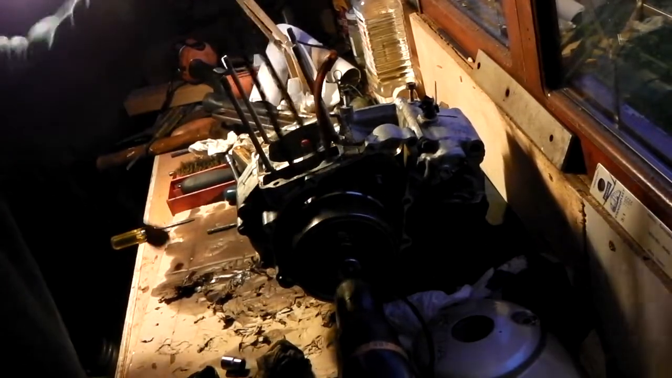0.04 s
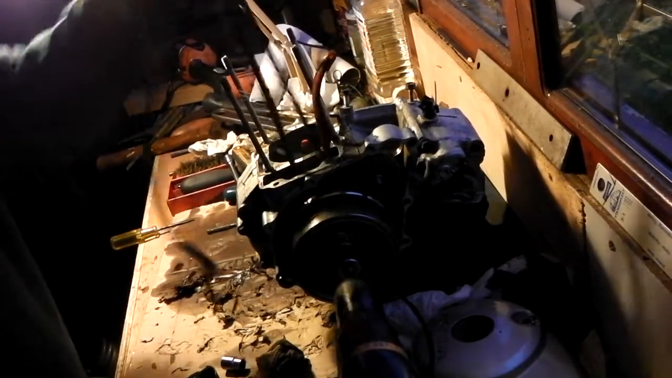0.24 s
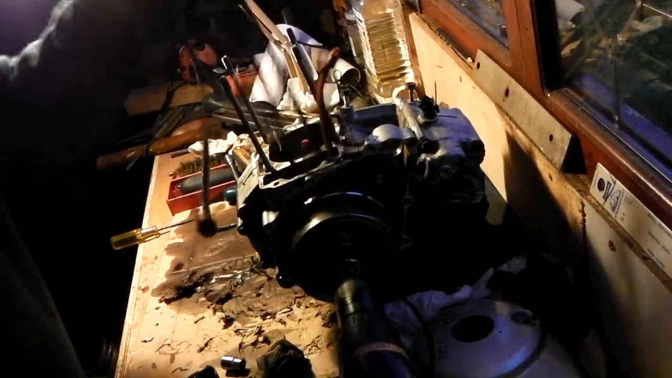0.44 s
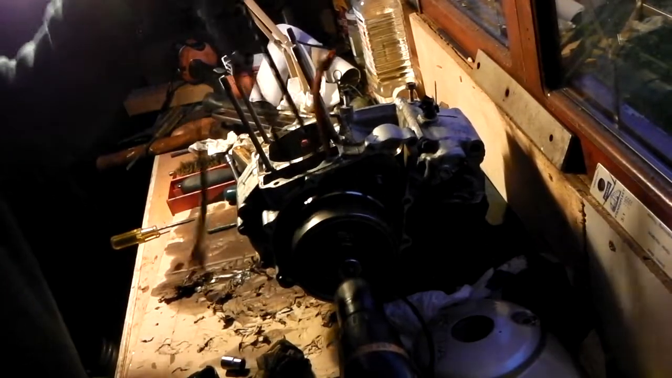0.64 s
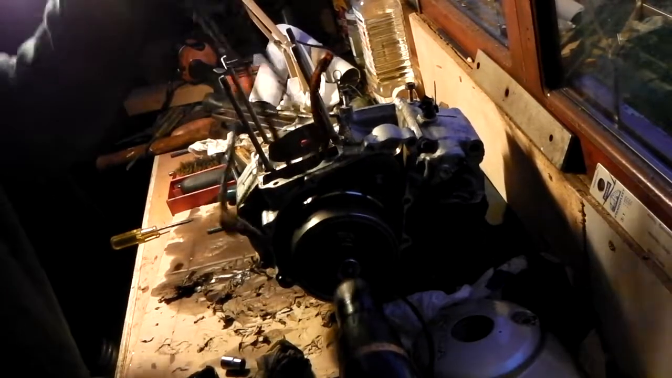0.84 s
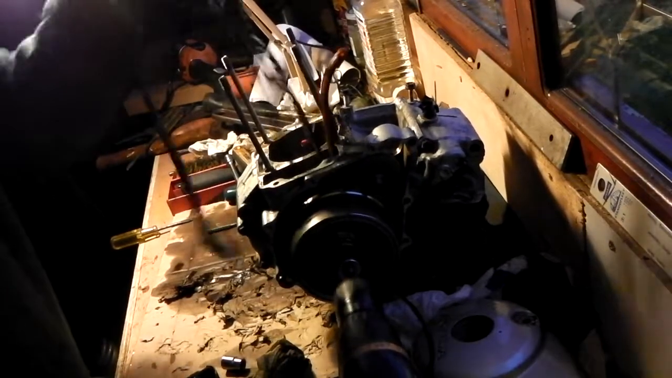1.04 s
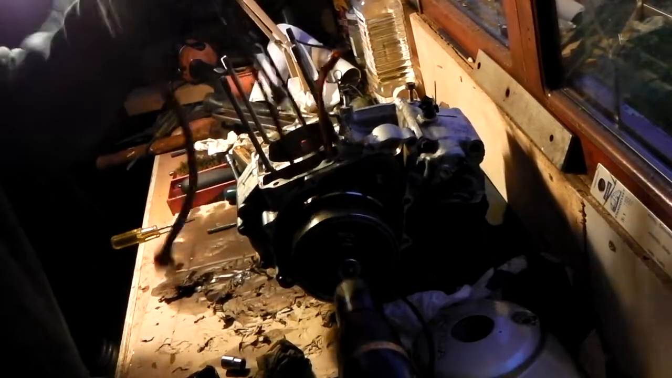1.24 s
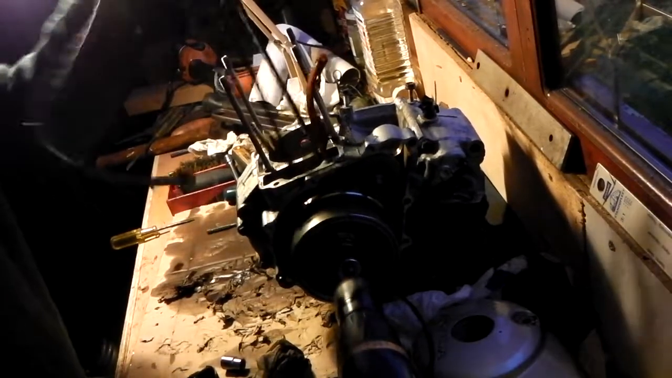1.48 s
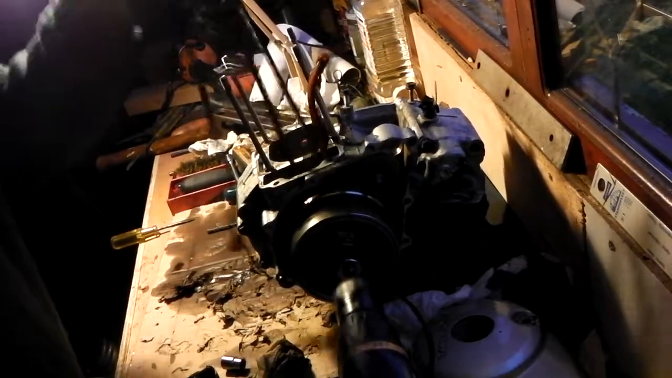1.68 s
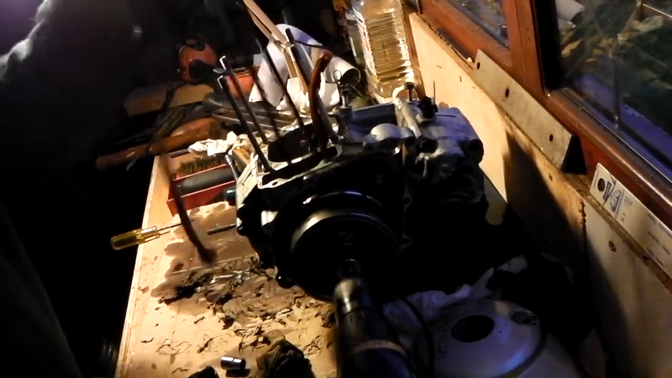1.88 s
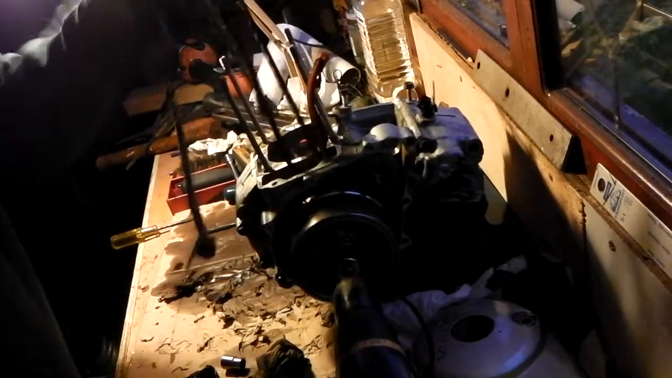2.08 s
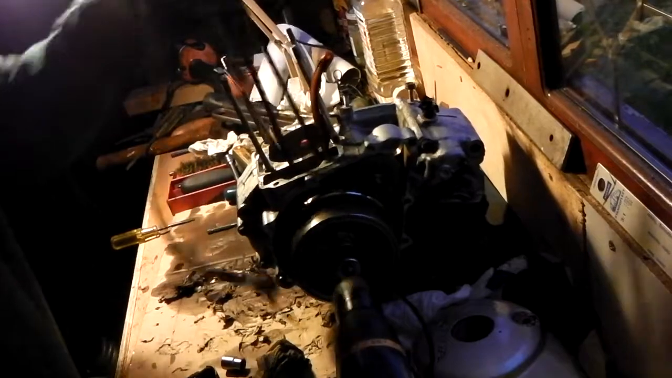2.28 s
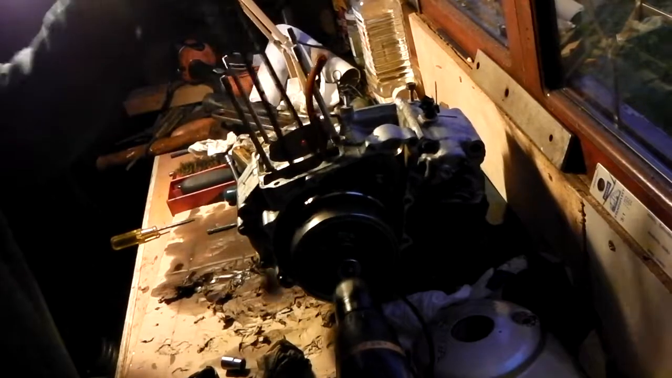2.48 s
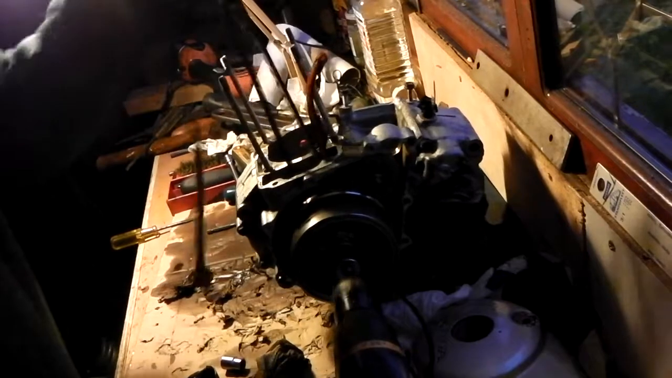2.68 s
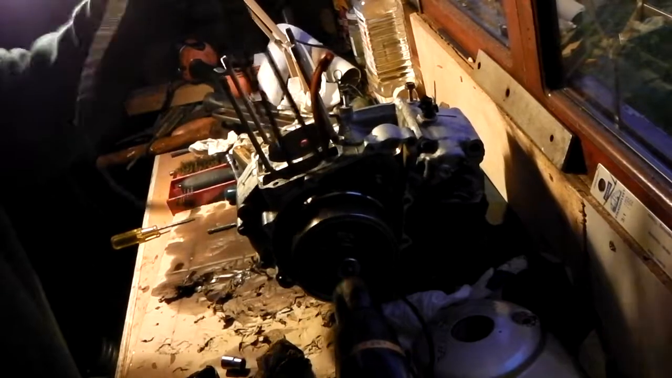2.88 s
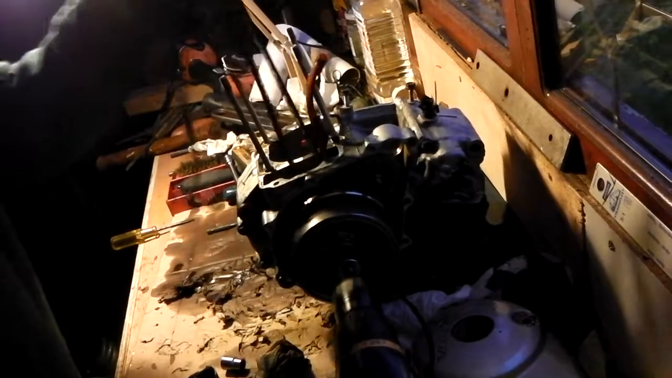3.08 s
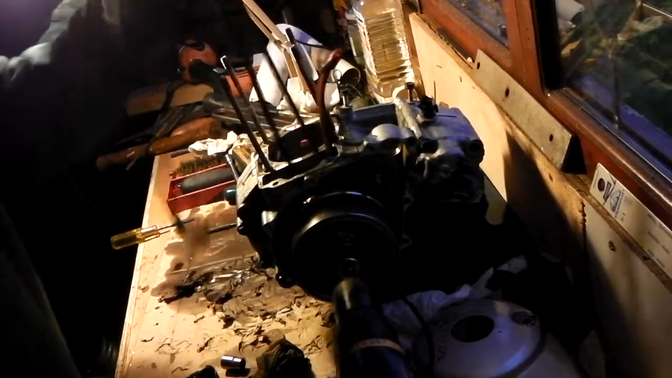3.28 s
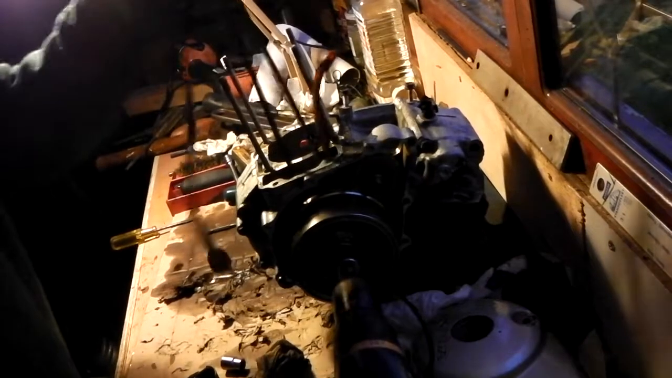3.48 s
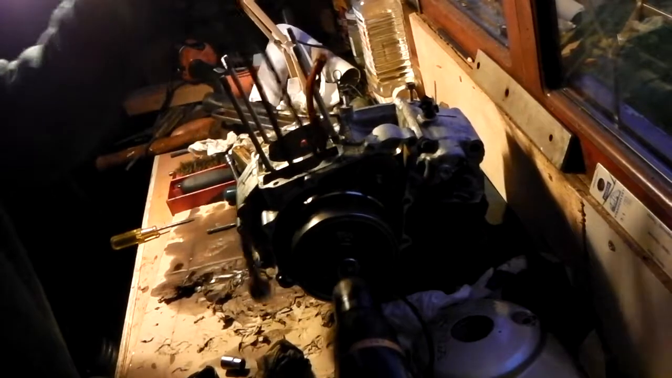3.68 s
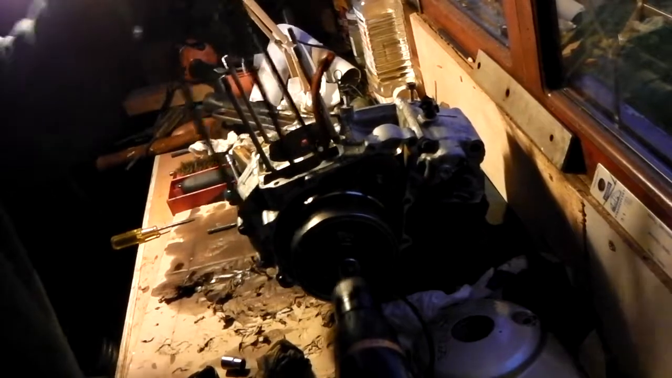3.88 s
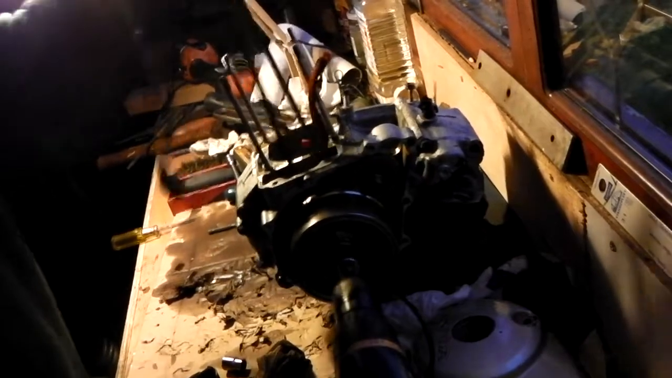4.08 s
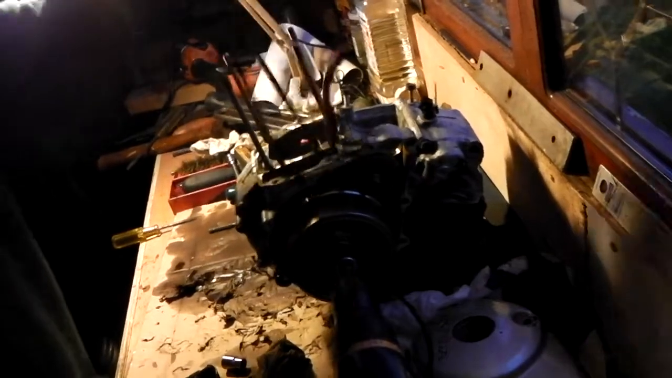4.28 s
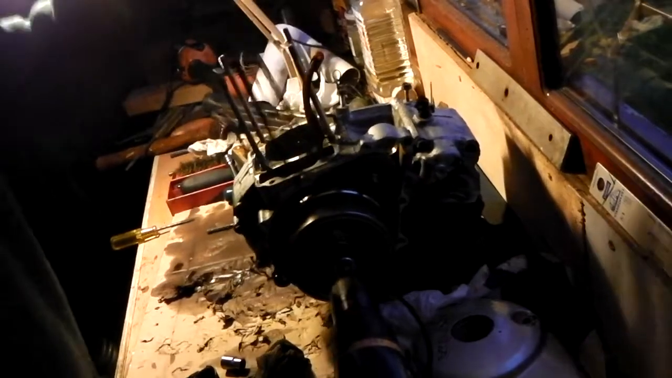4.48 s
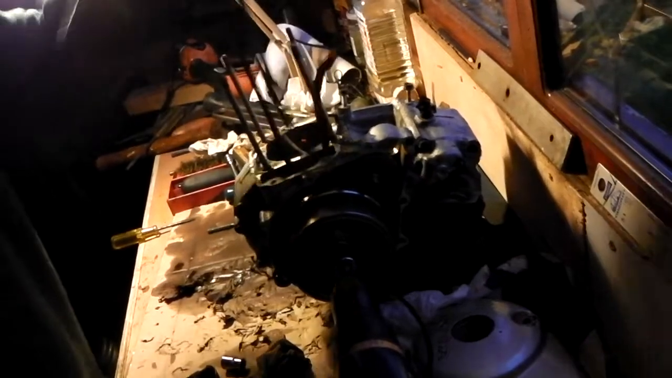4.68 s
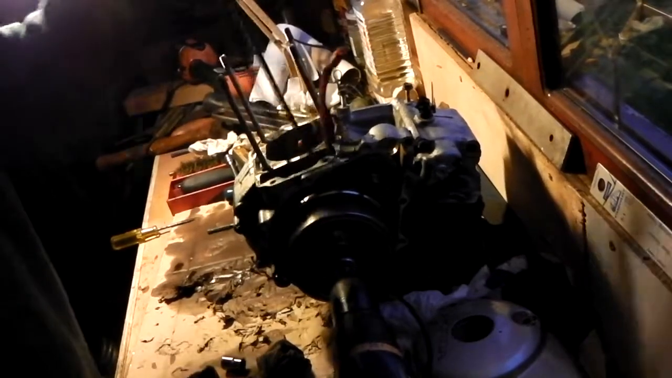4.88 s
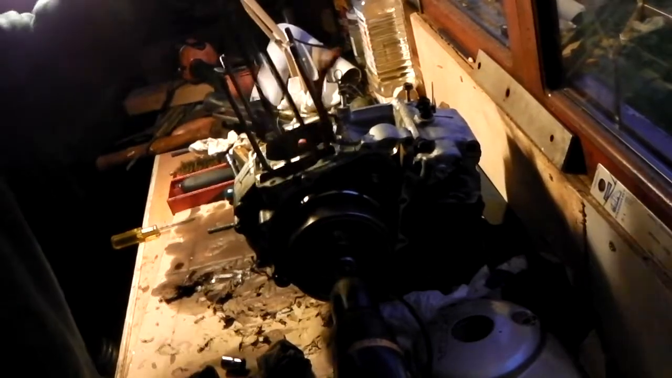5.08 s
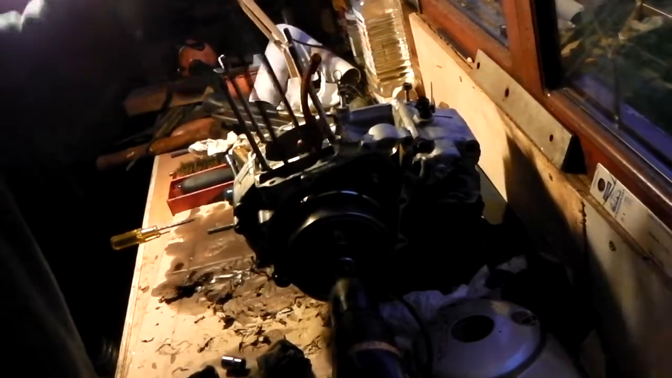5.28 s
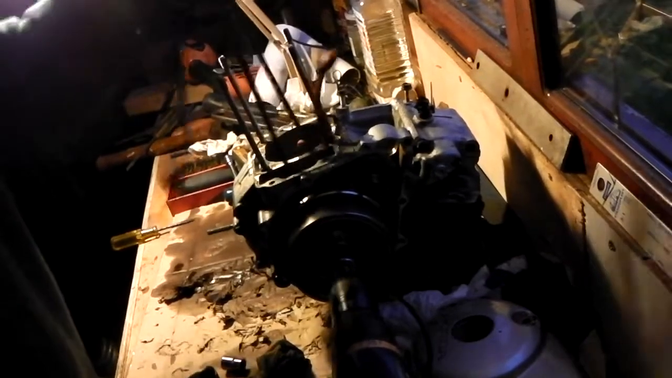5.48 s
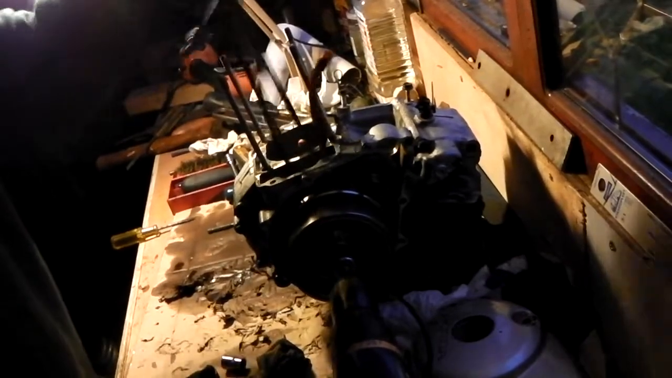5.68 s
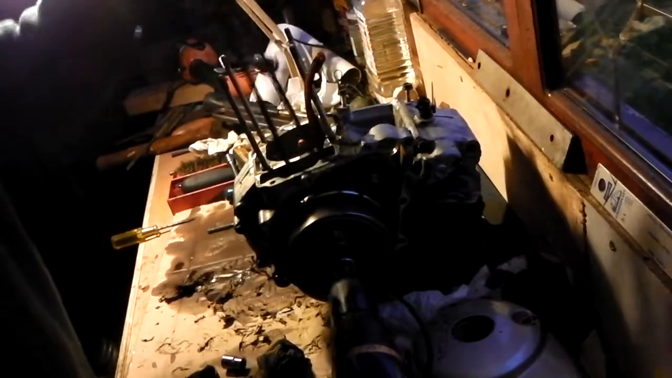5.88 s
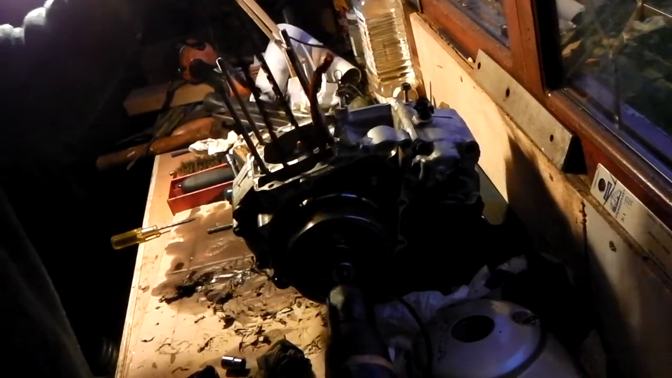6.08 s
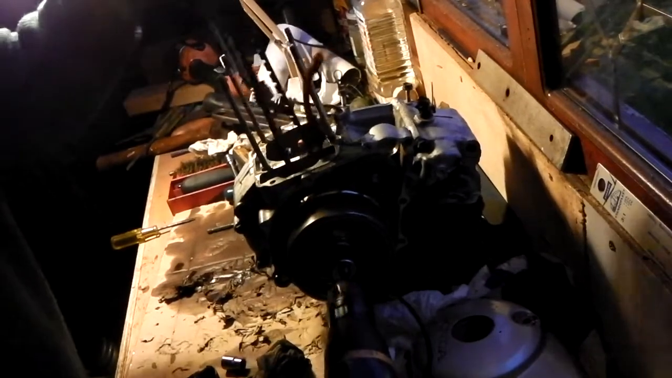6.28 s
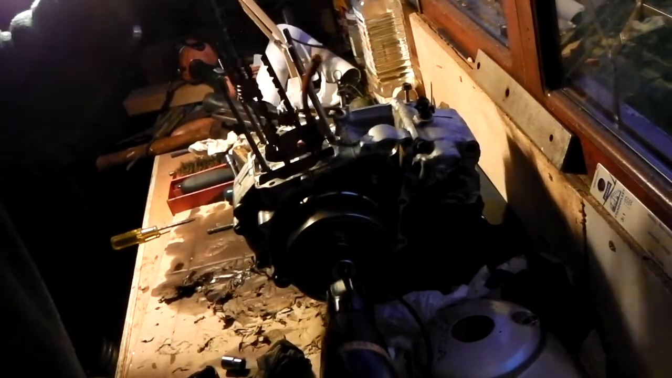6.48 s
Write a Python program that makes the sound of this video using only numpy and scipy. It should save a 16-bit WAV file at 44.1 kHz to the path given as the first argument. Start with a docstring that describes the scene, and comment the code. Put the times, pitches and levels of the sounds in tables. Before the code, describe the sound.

Heard very close in a small wooden shed, an electric drill is already spinning a stripped engine on a bench. From 0 to 3 s a loose chain rattles continuously and slaps the metal case about six times a second, hard steel clashes with hollow knocks; the whine and gear growl labour and recover once each turn. Between about 1.9 and 3 s distinct slaps are sparser within the rattle, with a dull clunk at 2.4. From 3.1 the drill surges, peaking near 3.7 to 3.9, with slaps crowding to nearly ten a second. It eases around 4.2, the hits strong at roughly eight a second, then gets lighter and more sizzling after 4.8. Bench thumps and gritty wood scrapes appear from 5.1 to 5.9, a heavier thump near 5.55. At 5.95 the drill is released; a clunk and last hard slap ring out at 5.99. Quiet hiss, faint ticks at 6.3 and 6.45, and a soft settling ring finish by 6.5.

```python
"""A drill whines and a loose cam chain rattles and slaps: an electric drill spins a stripped motorcycle engine.
The whine is motor orders through the housing, labouring once a lap of the crank; chain and slaps are bunched
noise. Slaps ring the crankcase modes; the rocking engine and the harder slaps thump the wooden bench; a small
shed adds a short tail. The drill is let go, the chain lands a last hard time and the steel rings out."""
import sys
import numpy as np
from scipy import signal
from scipy.fft import rfft, irfft, next_fast_len
from scipy.io import wavfile
from scipy.ndimage import map_coordinates

SR = 44100
rng = np.random.default_rng(int(sys.argv[2]) if len(sys.argv) > 2 else 0)


def dump_mix(stems):
    """Bounce the given channels to the path in sys.argv[1] as a 16-bit WAV at rate SR."""
    frames = np.atleast_2d(stems).T  # one column per channel
    limited = np.clip(frames, -1, 1)  # hard clip at full scale
    pcm = np.round(limited * 32767).astype(np.int16)
    wavfile.write(sys.argv[1], SR, pcm)


N = 288414


def amp(db):
    """Decibels to amplitude ratio."""
    return 10 ** (np.asarray(db) / 20)


def unit(x):
    """Scale to unit RMS."""
    return x / np.sqrt(np.mean(x ** 2) + 1e-20)


def along(points, hz):
    """Interpolate (hz, value) points on a log frequency axis."""
    point_hz, values = np.transpose(points)
    return np.interp(np.log(hz + 1), np.log(point_hz + 1), values)


def curves(rows):
    """One value per sample for each column after the time."""
    times_s, *columns = np.transpose(rows)
    return [np.interp(np.arange(N) / SR, times_s, column) for column in columns]


def wobble(rate_hz):
    """Smooth random curve of unit RMS, rate_hz knots a second."""
    knots = rng.standard_normal(int(N * rate_hz / SR) + 4)
    return unit(map_coordinates(knots, [np.arange(N) * rate_hz / SR]))


def filtered(x, response):
    """Multiply the spectrum of x by a complex response of frequency."""
    size = next_fast_len(N + 2 * SR)
    return irfft(rfft(x, size) * response(np.fft.rfftfreq(size, 1 / SR)), size)[..., :N]


def coloured(x, spectrum):
    """Shape a white signal, keeping its power."""
    return filtered(x, lambda f: unit(amp(along(spectrum, f))))


def resonance(f, hz, width_hz):
    """Response of one damped mode, unity at its centre."""
    return 1j * f * width_hz / (hz * hz - f * f + 1j * f * width_hz)


def add(track, start_s, sound):
    """Mix a sound in at a time."""
    start = max(0, round(start_s * SR))
    part = sound[..., :max(0, N - start)]
    track[..., start:start + part.shape[-1]] += part


def clatter(rate_hz, depth_db):
    """Two noises bunched into the same tiny contacts."""
    return unit(rng.standard_normal((2, N)) * amp(depth_db * wobble(rate_hz)))


# drill trigger: time_s, mean_motor_rev_per_s
MOTOR_SPEED = [(0, 429.3), (0.65, 434.2), (1.24, 439.1), (1.8, 462.7), (2.46, 478.1), (2.66, 475.8),
               (3.04, 506.5), (3.37, 653.9), (3.63, 710.3), (3.88, 718.4), (4.3, 584.9), (4.54, 568.7),
               (5.14, 599), (5.19, 584), (5.43, 624.7), (5.93, 625.7), (6, 582)]
GEAR_RATIO, FIRST_PEAK_LAPS = 74.93, .294  # motor revs per crank lap; laps to first load peak


def crank():
    """Laps turned so far; the load peaks at every whole number."""
    return np.cumsum(curves(MOTOR_SPEED)[0]) / SR / GEAR_RATIO - FIRST_PEAK_LAPS


# load round one lap: lap_share, load_about_mean
LAP_LOAD = [(0, .6), (.573, -.4), (.714, -.4), (1, .6)]


def load():
    """The drag of the engine, rising and falling with the crank angle."""
    return np.interp(crank() % 1, *np.transpose(LAP_LOAD))


# share of speed lost per unit load at SAG_REV_PER_S; faster, the flywheel carries it through
SAG, SAG_REV_PER_S, FLYWHEEL_POWER = .13, 430, 2.9


def motor_speed():
    """The motor labours and picks up again once a lap."""
    mean, = curves(MOTOR_SPEED)
    sag = SAG * (SAG_REV_PER_S / mean) ** FLYWHEEL_POWER
    return mean * (1 - sag * load())


def load_peaks():
    """The moment of greatest load in each lap, while the drill drives."""
    laps, t = crank(), np.arange(N) / SR
    lap_count = np.interp(MOTOR_SPEED[-1][0], t, laps)
    return np.interp(np.arange(lap_count), laps, t)


def each_lap(levels, delay_s, scatter_db):
    """One (start_s, level_db) event a lap, its strength read from a level curve."""
    times = load_peaks() + delay_s
    levels_db = np.interp(times, *np.transpose(levels)) + scatter_db * rng.standard_normal(len(times))
    return list(zip(times, levels_db))


def tones(turn, orders):
    """Shaft orders that flicker in strength and drift in phase between the shared and unshared parts."""
    drift = np.array([np.zeros(N), 2 * wobble(12)])
    return sum(amp(db + 2.6 * wobble(60)) * np.sin(round(order) * turn + drift) for order, db in orders)


# whine, relative: time_s, fan_db, commutator_db
WHINE = [(0, -39, -36), (1.6, -36, -34), (2.95, -36, -33), (3.2, -29, -27.5), (3.5, -29, -37),
         (3.9, -34, -36), (4.7, -36, -38.5), (5.1, -34.5, -36.5), (5.9, -40, -40), (6.1, -90, -90)]
# shaft judder under load: time_s, judder_rms_rad
JUDDER = [(0, .04), (1.2, .055), (2.9, .06), (3.3, .055), (4.2, .055), (6, .04)]
# fan orders: motor_speed_multiple, relative_db
FAN = [(2, -9), (4, 0), (8, -4.5)]
# commutator orders: motor_speed_multiple, relative_db
COMMUTATOR = [(6, 0), (12, -4)]
# drill housing response: freq_hz, relative_db
HOUSING = [(800, -14), (1600, -8), (1850, -1), (2100, 0), (2400, 0), (2560, -4), (2740, 4), (2950, 0),
           (3550, 0), (4300, -6), (5400, -2), (7000, -8), (10000, -20)]
# reduction gear growl: time_s, level_db
GEAR = [(0, -46.5), (1.2, -48.5), (2.9, -42), (3.3, -57), (5.9, -60), (6.05, -100)]
SURGE_DB, WAVER_RMS_DB = 6.5, 1.8  # whine drop per unit of load; slow random variation


def drill():
    """Motor tones through the housing, swelling as the motor picks up in each lap, and the growl of the gear."""
    speed = motor_speed()
    fan_db, commutator_db = curves(WHINE)
    surge_db = WAVER_RMS_DB * wobble(16) - SURGE_DB * load()
    turn = 2 * np.pi * np.cumsum(speed * (1 + .003 * wobble(260))) / SR
    turn = turn + curves(JUDDER)[0] * wobble(220)
    motor = tones(turn, FAN) * amp(fan_db) + tones(turn, COMMUTATOR) * amp(commutator_db)
    whine = filtered(motor * amp(surge_db + 4), lambda f: amp(along(HOUSING, f)))
    mesh_order = 1.07
    growl = unit(np.sin(mesh_order * turn + .3 * wobble(90)) * amp(2.5 * wobble(50)))
    return whine + growl * amp(curves(GEAR)[0]) * np.array([[1], [0]])  # growl in the shared part only


# running chain and gears, relative: time_s, rattle_db, hiss_db
RUNNING = [(0.0, -21.5, -31.5), (1.05, -18, -32.5), (1.45, -19.5, -30.5), (3.38, -17.5, -29),
           (3.66, -23.5, -27.5), (4.23, -23.5, -34), (4.71, -27, -35.5), (5.18, -25.5, -34.5),
           (5.9, -26.5, -37), (6.11, -36, -62)]
# rattle spectrum: freq_hz, relative_db_per_hz
RATTLE = [(150, -55), (250, -25), (528, -8.5), (586, -11.5), (1610, -6.5), (1880, -6), (2400, -5.5),
          (2860, -1), (3340, -3.5), (3840, 2), (4190, -6), (5730, -1.5), (7700, -18.5), (8700, -16.5),
          (16000, -25.5)]
# chain sizzle spectrum: freq_hz, relative_db_per_hz
SIZZLE = [(4000, -23), (7000, 4), (9000, 1.5), (11000, -4), (16000, -6)]


def rattle():
    """Links and teeth chatter for as long as the crank is driven."""
    rattle_db, hiss_db = curves(RUNNING)
    driven = np.interp(np.arange(N) / SR, [5.96, 6.14], [1, 0])
    body = coloured(clatter(rate_hz=700, depth_db=-1), RATTLE) * amp(rattle_db + 0.87 * wobble(90))
    hiss = coloured(clatter(rate_hz=450, depth_db=0.5), SIZZLE) * amp(hiss_db)
    return (body + hiss) * driven


# chain against the case, relative: start_s, clash_db, sizzle_db
SLAPS = [(0.0014, -8.5, -24), (0.0897, -10.5, -20.5), (0.286, -14.5, -36), (0.3694, -18, -27),
         (0.4422, -10, -24), (0.6147, -12.5, -29), (0.79, -13.5, -28), (0.967, -17, -36),
         (1.1344, -10.5, -18.5), (1.3083, -12, -26), (1.479, -12, -30), (1.6544, -10, -38),
         (1.8158, -13, -41), (2.513, -16, -21.5), (3.13, -11, -17.5), (3.2898, -10, -25),
         (3.413, -9.5, -17), (3.5247, -11.5, -15), (3.5883, -11, -27), (3.628, -9.5, -17.5),
         (3.7352, -10, -16.5), (3.8365, -9, -15.5), (3.941, -10.5, -24), (4.123, -7, -22),
         (4.2502, -7, -19.5), (4.3798, -6, -15.5), (4.515, -8.5, -16.5), (4.6456, -8, -20),
         (4.778, -16, -16.5), (4.894, -13, -24.5), (5.0286, -15.5, -24), (5.278, -12, -13),
         (5.4004, -14, -13), (5.5164, -10.5, -22.5), (5.6401, -16, -17), (5.7592, -15.5, -14.5),
         (5.8726, -14.5, -29), (5.914, -13.5, -18), (5.9863, -8, -19), (6.2906, -52, -56),
         (6.4512, -51, -62)]


def slap_part(levels_db, spectrum, hold_s, t60_s, gain_db):
    """A run of links lands within a few milliseconds, then the chatter dies."""
    t = np.arange(SR // 3) / SR
    shape = (1 - np.exp(-t / 0.0002)) * amp(-60 * np.maximum(t - hold_s, 0) / t60_s)
    power = np.zeros(N)
    for (start_s, *_), level_db in zip(SLAPS, levels_db):
        add(power, start_s, (amp(level_db + gain_db) * shape) ** 2)
    return coloured(np.sqrt(power) * clatter(rate_hz=600, depth_db=2.0), spectrum)


# how squarely the chain meets the side cover: time_s, knock_re_clash_db
HOLLOW = [(0, -10), (0.8, -3.5), (1.8, -8.5), (2.8, -11), (3.35, -6.5), (3.9, -9.5), (4.3, -15), (4.9, -11),
          (6, -14)]
# steel clash spectrum: freq_hz, relative_db_per_hz
CLASH = [(1000, -20), (2000, -6.5), (2900, -3.5), (3800, 5), (4500, -3.5), (5700, 2), (7000, -6.5),
         (9000, -36), (14000, -27)]
# hollow knock spectrum: freq_hz, relative_db_per_hz
KNOCK = [(150, -39.5), (330, -30), (600, 0.5), (1100, 3.5), (1700, 5.5), (2500, -9), (5000, -36.5)]


def slaps():
    """Each slap is a steel clash with a sizzle on top and a hollow knock that rings the side cover."""
    times, clash_db, sizzle_db = np.transpose(SLAPS)
    knock_db = clash_db + np.interp(times, *np.transpose(HOLLOW))
    clash = slap_part(clash_db, CLASH, hold_s=0.0041, t60_s=.16, gain_db=-3.0)
    knock = slap_part(knock_db, KNOCK, hold_s=0.0048, t60_s=0.1, gain_db=-4.5)
    sizzle = slap_part(sizzle_db, SIZZLE, hold_s=0.012, t60_s=0.16, gain_db=-0.5)

    def cover_modes(f):
        low = amp(8) * resonance(f, hz=822, width_hz=15.5)
        high = amp(7.5) * resonance(f, hz=1785, width_hz=94)
        return low + high

    return clash + knock + filtered(knock, cover_modes) + sizzle


# how loosely the chain flies: time_s, lull_depth_db
SLACK = [(0, 2.7), (1.2, 1.4), (3.1, 1.3), (3.3, 7.7), (3.7, 2.7), (4.05, 0.98), (4.4, 7.2), (4.9, 4.9),
         (5.1, 2.3), (6, 3.1)]
LULL_FALL_S, LULL_HOLD_S, LULL_RISE_S = 0.027, 0.0086, 0.0076


def lulls():
    """The load lets go as the chain flies free, just before it lands: a gain dip before each slap."""
    dip, t = np.zeros(N), np.arange(N) / SR
    corners_s = [-LULL_FALL_S - LULL_HOLD_S, -LULL_HOLD_S, 0, LULL_RISE_S]
    for start_s, *_ in SLAPS:
        dip = np.maximum(dip, np.interp(t - start_s, corners_s, [0, 1, 1, 0]))
    return amp(-dip * curves(SLACK)[0])


# crankcase modes: freq_hz, width_hz, relative_db
CASE = [(816, 21, 1.5), (1217.5, 21, 2.5), (1340, 17, -5), (1835, 35, -1.5), (2205, 33, -2.5),
        (2620, 17, -26), (2700, 10, -19), (2780, 6.9, -1), (3200, 12, -19), (3500, 20, 5.5),
        (3567, 0.56, 3), (3780, 64, -27), (4140, 33, -7), (5350, 12, -13), (5360, 17, -6), (5845, 11, 7),
        (5840, 2.5, -6.5), (6140, 46, -1.5)]


def crankcase(x):
    """Chain and gear contacts ring the same modes of the case."""
    def modes(f):
        return 1 + sum(amp(db) * resonance(f, hz, width_hz) for hz, width_hz, db in CASE)

    return amp(-4.5) * filtered(x, modes)


# gear ping strength: time_s, relative_db
TAPS = [(0, -31), (0.7, -29.5), (1.25, -31.5), (1.9, -44), (3.2, -42), (4, -51)]
# gear wheel modes: freq_hz, relative_db, t60_s
TOOTH = [(1197, 2.5, 0.17), (2390, -1.5, 0.33)]
TAP_LEAD_S, TAP_SCATTER_DB = .027, 4.5  # before the load peak; lap to lap


def taps():
    """Soft pings of the gear wheel as the gears take up their play just before each load peak."""
    out, t = np.zeros((2, N)), np.arange(SR // 3) / SR
    for start_s, tap_db in each_lap(TAPS, -TAP_LEAD_S, TAP_SCATTER_DB):
        ring = np.zeros(len(t))
        for hz, mode_db, t60_s in TOOTH:
            decay = amp(tap_db + mode_db + rng.normal(0, 1.6) - 60 * t / t60_s)
            ring += decay * np.sin(2 * np.pi * hz * rng.normal(1, 0.0015) * t)
        add(out[0], start_s, ring * (1 - np.exp(-t / 0.0042)))
    return out


# case singing under strain, at its peak in each lap: time_s, level_db
STRAIN = [(0, -38.5), (1.2, -30.5), (2.8, -37), (3.3, -38.5), (5.9, -41), (6.05, -90)]
STRAIN_PEAK_LAPS, STRAIN_HALF_SWING_DB = 0.19, 9


def strain():
    """A narrow rubbing ring that swells just after each load peak."""
    noise = rng.standard_normal((2, N))
    ring = unit(filtered(noise, lambda f: resonance(f, hz=1840, width_hz=144) ** 2))
    swell = np.cos(2 * np.pi * (crank() - STRAIN_PEAK_LAPS)) - 1
    return ring * amp(curves(STRAIN)[0] + STRAIN_HALF_SWING_DB * swell)


# engine rocking once a lap: time_s, relative_thump_db
ROCKING = [(0, -34), (0.75, -29.5), (1.3, -44), (2.4, -41.5), (3.2, -43), (3.8, -36.5), (4.4, -48),
           (4.55, -34.5), (4.82, -47), (5.18, -30.5), (5.43, -39), (5.55, -20.5), (5.8, -39), (5.91, -44)]
# off-beat thumps as the harder slaps push the bench, and the engine coming to rest: start_s, relative_thump_db
JOLTS = [(0.965, -32), (1.142, -27), (3.329, -33), (3.425, -31.5), (4.897, -31), (5.945, -36),
         (6.003, -35), (6.105, -39.5), (6.177, -46), (6.349, -50)]
# bench modes: freq_hz, width_hz, relative_db
BENCH = [(82.3, 29, -4), (125, 44, 2.5), (184.5, 60, -0.5)]
# rumble spectrum: freq_hz, relative_db_per_hz
RUMBLE = [(20, -23), (45, -0.5), (75, 3.5), (125, 6), (190, -3), (300, -25), (600, -27.5)]
# bench rumble: time_s, level_db
SHAKE = [(0, -51.5), (3, -49), (3.5, -49.5), (6, -50), (6.25, -61), (6.54, -77)]
THUMP_LAG_S, THUMP_SCATTER_DB = 0.00636, 1  # after the load peak; lap to lap


def bench():
    """The engine's weight thumps the boards and drops back once, more softly, over a steady rumble."""
    pushes = np.zeros((2, N))
    for start_s, db in each_lap(ROCKING, THUMP_LAG_S, THUMP_SCATTER_DB) + JOLTS:
        spread = np.array([[1], [rng.normal(0, 0.97)]])
        add(pushes, start_s, amp(db + 46.5) * np.hanning(96) / 48 * spread)
        add(pushes, start_s + 0.0231, amp(min(db, -33) + 44.5) * np.hanning(256) / 128 * spread)

    def modes(f):  # alternating signs
        return sum((-1) ** k * amp(db) * resonance(f, hz, width_hz)
                   for k, (hz, width_hz, db) in enumerate(BENCH))

    rumble = coloured(clatter(rate_hz=36, depth_db=3.5), RUMBLE) * amp(curves(SHAKE)[0])
    return filtered(pushes, modes) + rumble


# room hiss spectrum: freq_hz, relative_db_per_hz
QUIET = [(18, -58), (30, -28), (109, -11), (252, -12.5), (913, -8.5), (1590, -13), (1810, -8), (2010, -10),
         (3580, -15.5), (16000, -33)]
# soft case ring as the crank settles: time_s, level_db
SETTLE = [(6.34, -110), (6.355, -55), (6.42, -55), (6.5, -62), (6.54, -72)]


def stillness():
    """Room hiss, a low hum and the soft ring as the crank settles."""
    air = coloured(rng.standard_normal((2, N)), QUIET) * amp(-59.0)
    hum = amp(-62.0) * np.sin(2 * np.pi * 112 * np.arange(N) / SR + .2 * wobble(4.8))
    noise = rng.standard_normal((2, N))
    ring = unit(filtered(noise, lambda f: resonance(f, hz=1810, width_hz=110) ** 2))
    return air + hum + ring * amp(curves(SETTLE)[0])


# dull clunks of the case: start_s, relative_db
CLUNKS = [(2.3979, -15), (5.944, -21.5)]
# first blow of a clunk: freq_hz, width_hz, relative_db
THUD = [(653, 170, -1), (1380, 650, 0)]


def clunks():
    """Short blows that the wood damps at once: a thud, then a brief chatter."""
    chatter, blows, t = np.zeros(N), np.zeros((2, N)), np.arange(SR // 4) / SR
    for start_s, db in CLUNKS:
        add(chatter, start_s, amp(db - 60 * t / 0.089))
        add(blows[0], start_s, amp(db + 28) * np.ones(1))

    def modes(f):
        return sum(amp(db) * resonance(f, hz, width_hz) for hz, width_hz, db in THUD)

    return filtered(blows, modes) + coloured(chatter * clatter(rate_hz=770, depth_db=3.5), KNOCK)


# case sliding along the boards: centre_s, half_width_s (to 1/e), peak_db
SCRAPES = [(5.098, 0.02, -39), (5.223, 0.024, -33.5), (5.335, 0.024, -47), (5.59, 0.032, -38.5),
           (5.705, .03, -35.5), (5.953, 0.02, -40.5)]
# scraped wood spectrum: freq_hz, relative_db_per_hz
BOARD = [(250, -32), (370, 1), (540, -1.5), (700, -7), (1300, -6), (3000, -29)]


def scrapes():
    """Short gritty slides on the wood: bunched noise under bell-shaped swells."""
    t = np.arange(N) / SR
    grit = coloured(clatter(rate_hz=250, depth_db=-0.5), BOARD)
    return grit * sum(amp(db) * np.exp(-((t - centre_s) / width_s) ** 2) for centre_s, width_s, db in SCRAPES)


# shed decay: freq_hz, t60_s
SHED = [(150, 0.12), (1000, 0.85), (4000, 0.38), (9000, 0.39), (16000, 0.43)]


def shed(x):
    """The walls answer with a short diffuse tail, 5 ms late."""
    hz, t, z = signal.stft(rng.standard_normal((2, SR // 2)), SR, nperseg=256)
    tail = signal.istft(z * amp(-60 * t / along(SHED, hz)[:, None]), SR, nperseg=256)[1]
    tail = np.pad(tail / np.linalg.norm(tail[0]), ((0, 0), (SR // 200, 0)))
    return signal.fftconvolve(x, tail, axes=1)[:, :N]


# left-right likeness: freq_hz, correlation
ALIKE = [(60, .75), (250, .88), (600, .94), (1400, .92), (3000, .62), (6000, .45), (15000, .48)]
# phase by which left leads: freq_hz, lead_rad
LEAD = [(200, -.15), (1500, -.08), (2200, -.15), (3000, -.45), (5000, -1.1), (7200, -3), (15000, -3.5)]
# left-right balance: freq_hz, left_re_right_db
LEAN = [(80, 5), (200, 2.5), (380, 0), (2400, 0), (4400, -2.4), (15000, -.4)]


def ports(pair):
    """A shared and an unshared part reach two close microphone ports."""
    def split(f):
        angle = np.arccos(np.clip(along(ALIKE, f), -1, 1)) / 2
        return np.array([np.cos(angle), np.sin(angle)])

    shared, apart = filtered(pair, split)
    sides = np.array([[.5], [-.5]])

    def offset(f):
        return amp(sides * along(LEAN, f)) * np.exp(1j * sides * along(LEAD, f))

    return filtered(np.array([shared + apart, shared - apart]), offset)


def scene():
    """Lulls dip the chain fully and the drill by half as many dB; the shed answers the machine."""
    chain = crankcase(rattle() * lulls() + slaps())
    driving = drill() * np.sqrt(lulls())
    machine = chain + driving + taps() + strain() + clunks() + scrapes()
    return ports(machine + amp(-12) * shed(machine) + bench() + stillness())


TOP_HZ = 15900


def record(dry):
    """The microphone lifts the treble and has a narrow notch; peaks round off at full scale; TOP_HZ ends the band."""
    lift = [(300, 0), (1500, 0), (3000, 1.5), (5000, 3), (8000, 5), (16000, 4.5)]  # freq_hz, gain_db

    def microphone(f):
        return amp(along(lift, f)) * (1 - resonance(f, hz=7900, width_hz=450)) ** 2

    x = filtered(dry, microphone)
    x = x / (1 + x ** 4) ** (1 / 4)
    return filtered(x, lambda f: f < TOP_HZ)


dry = scene()
out = record(dry)
dump_mix(out)
```